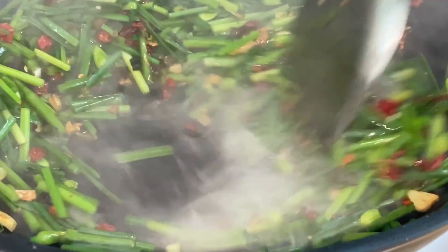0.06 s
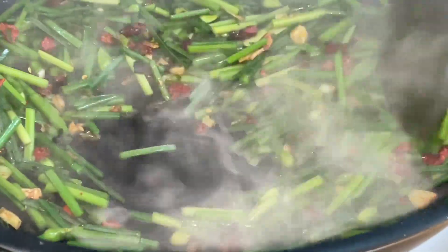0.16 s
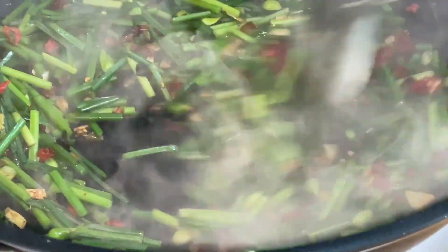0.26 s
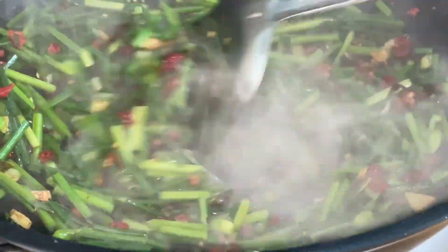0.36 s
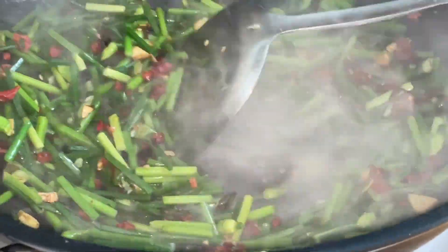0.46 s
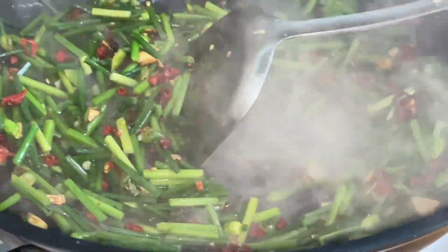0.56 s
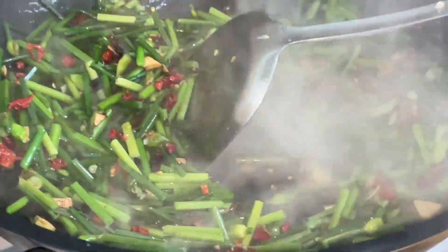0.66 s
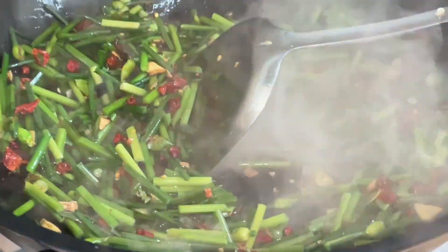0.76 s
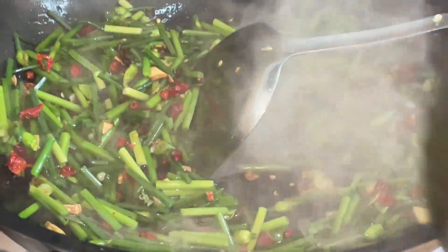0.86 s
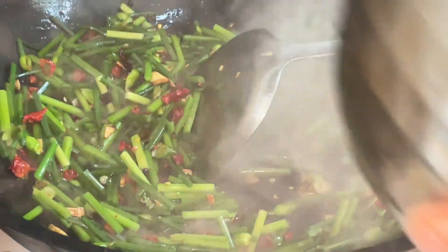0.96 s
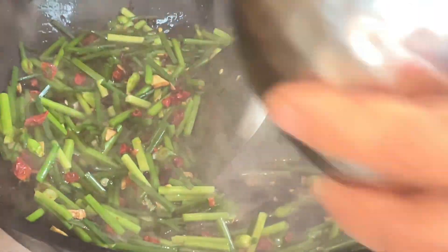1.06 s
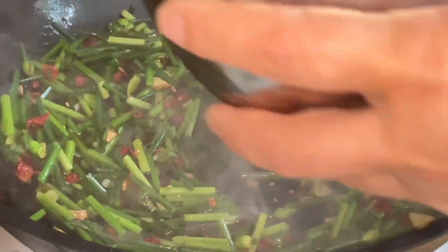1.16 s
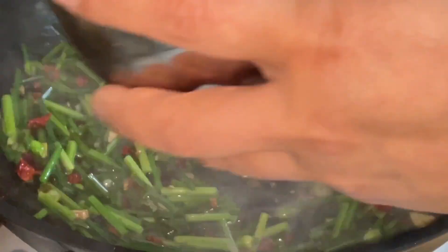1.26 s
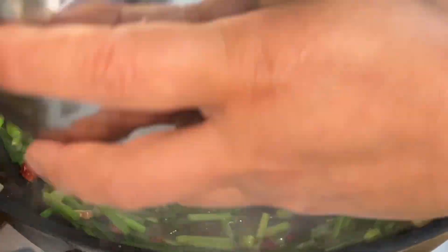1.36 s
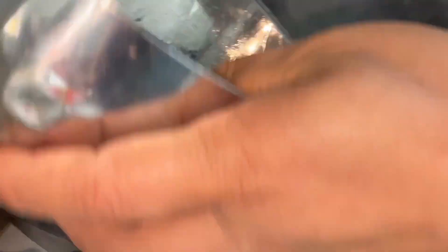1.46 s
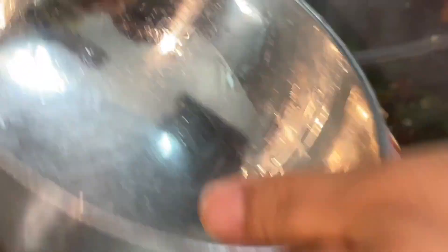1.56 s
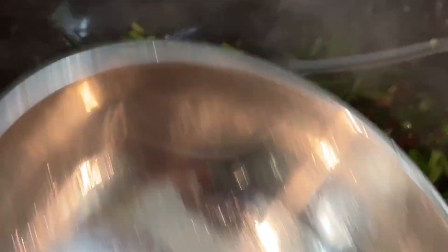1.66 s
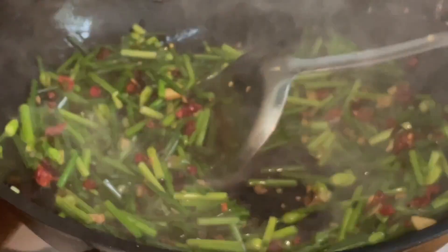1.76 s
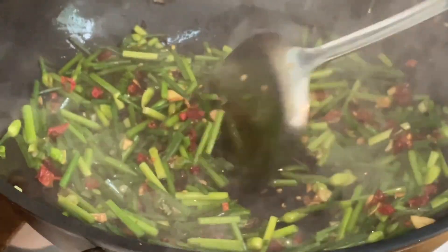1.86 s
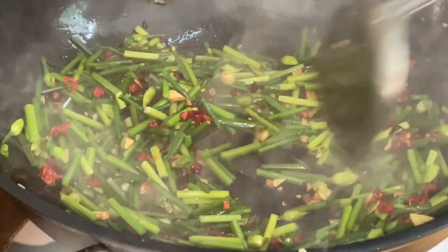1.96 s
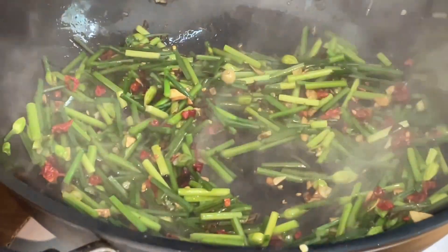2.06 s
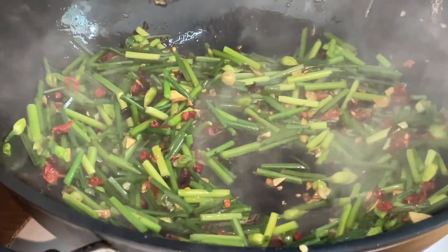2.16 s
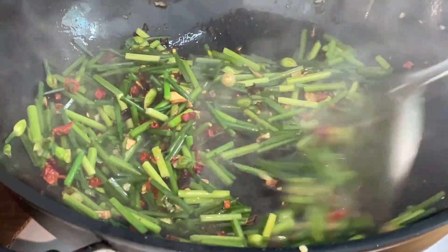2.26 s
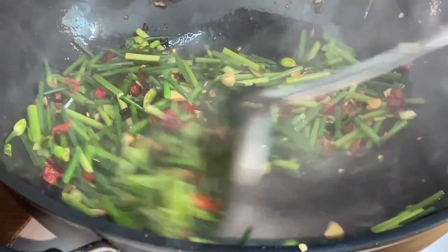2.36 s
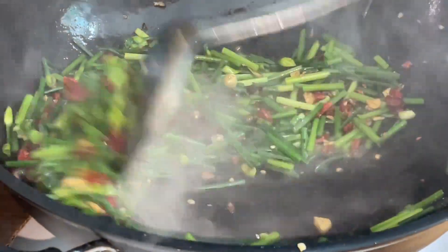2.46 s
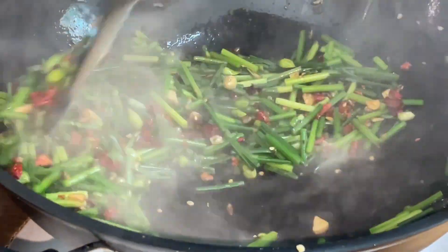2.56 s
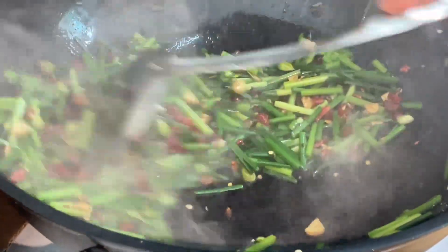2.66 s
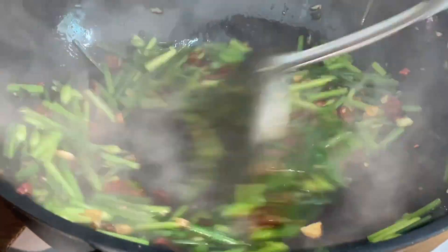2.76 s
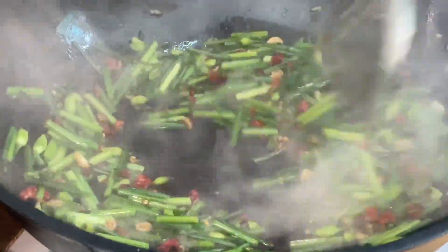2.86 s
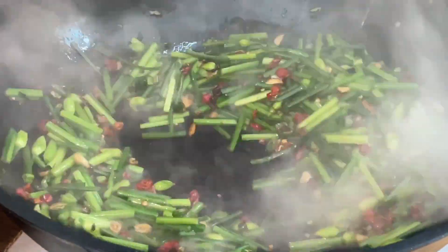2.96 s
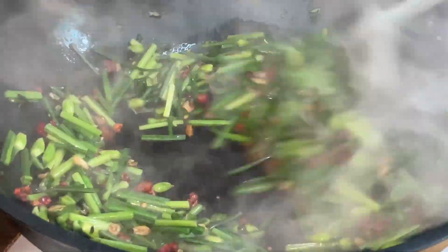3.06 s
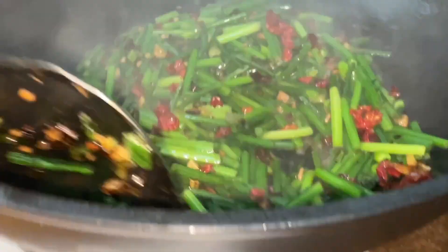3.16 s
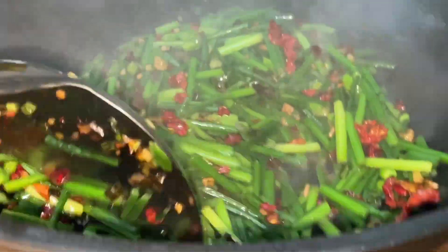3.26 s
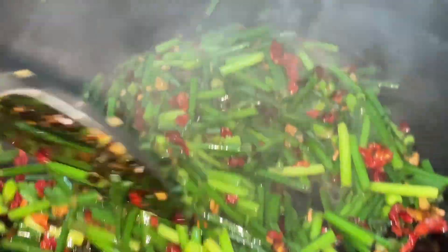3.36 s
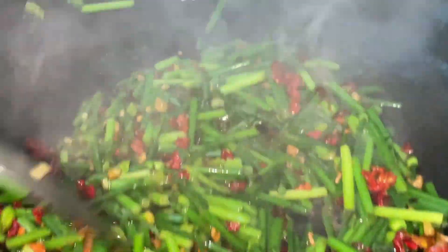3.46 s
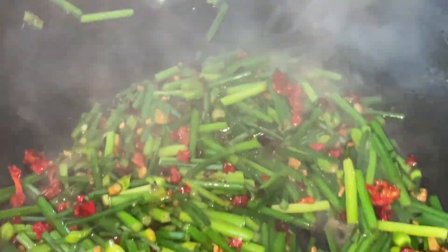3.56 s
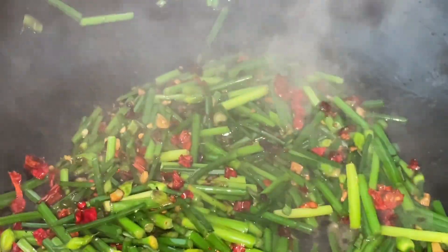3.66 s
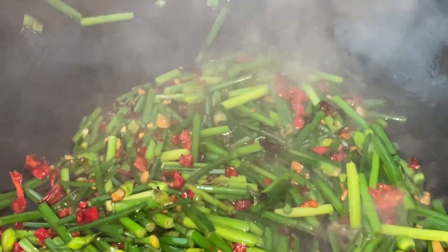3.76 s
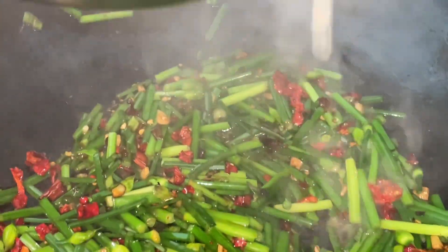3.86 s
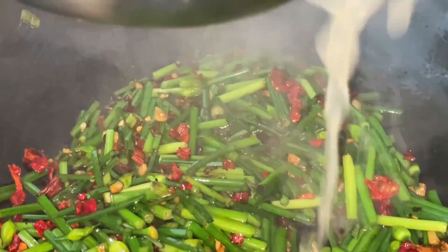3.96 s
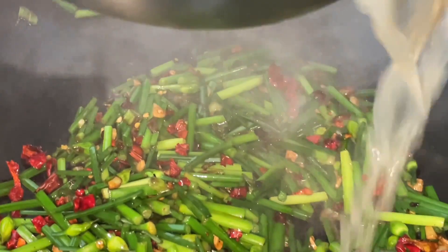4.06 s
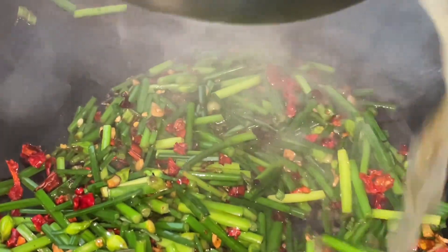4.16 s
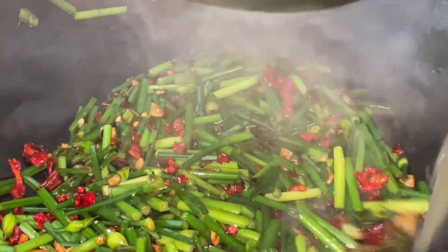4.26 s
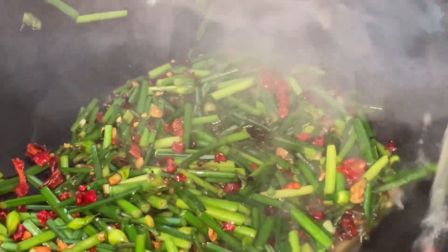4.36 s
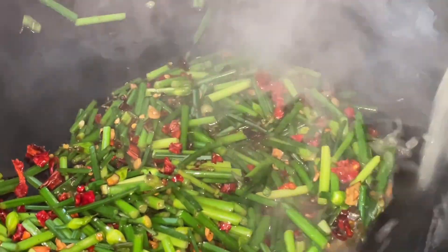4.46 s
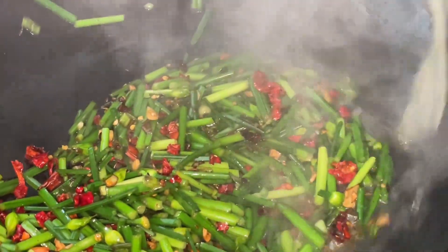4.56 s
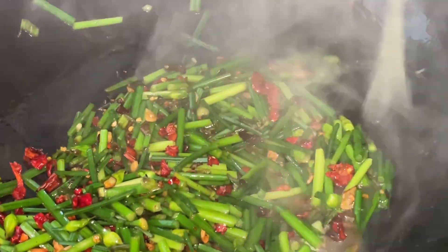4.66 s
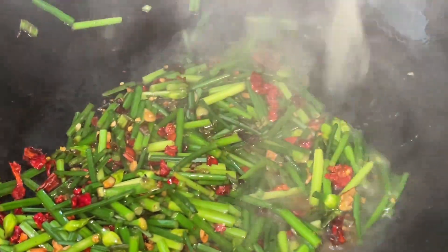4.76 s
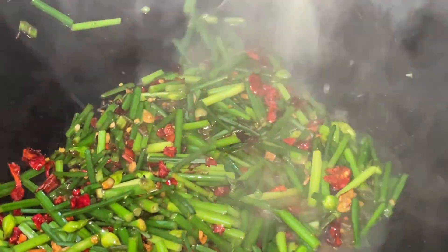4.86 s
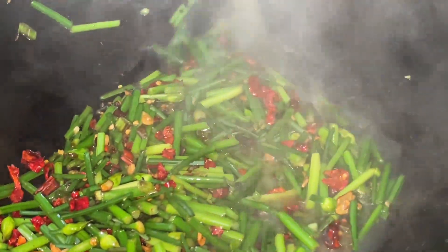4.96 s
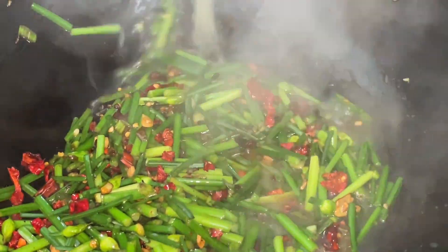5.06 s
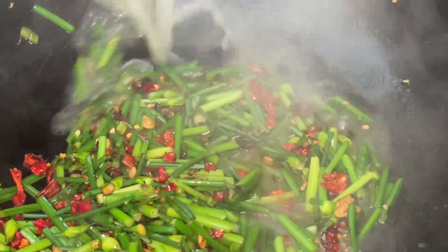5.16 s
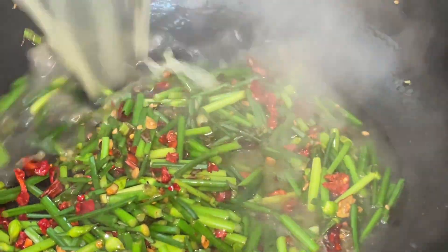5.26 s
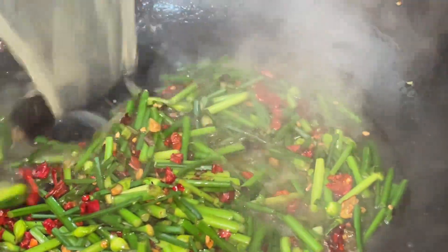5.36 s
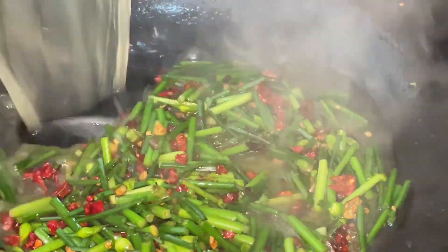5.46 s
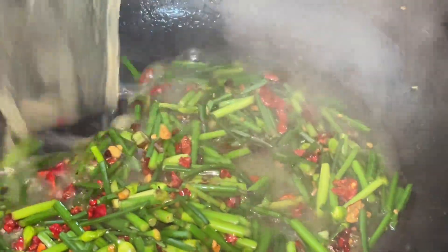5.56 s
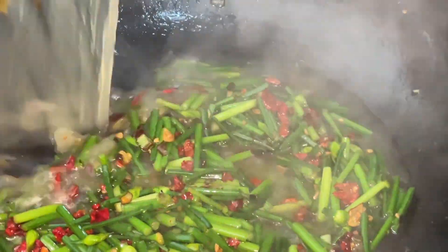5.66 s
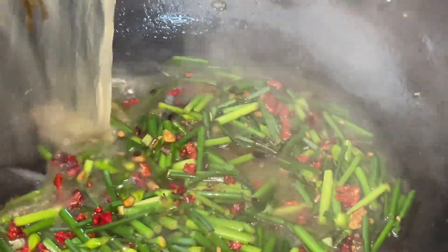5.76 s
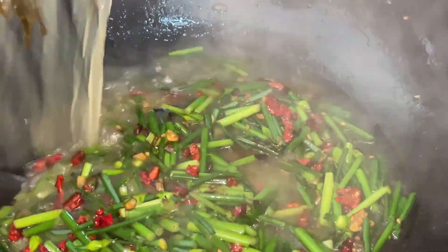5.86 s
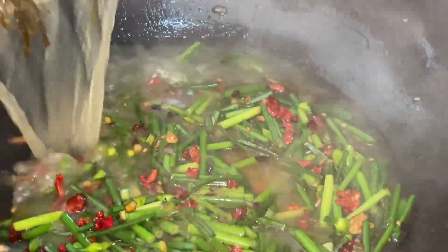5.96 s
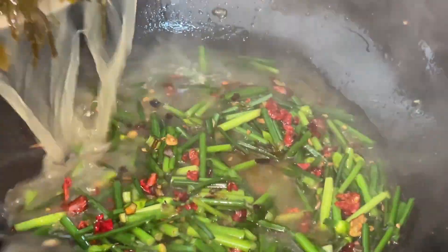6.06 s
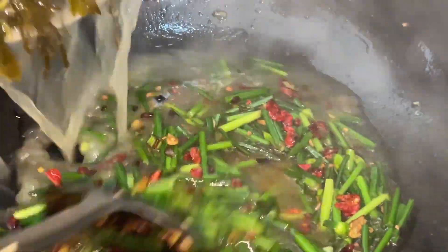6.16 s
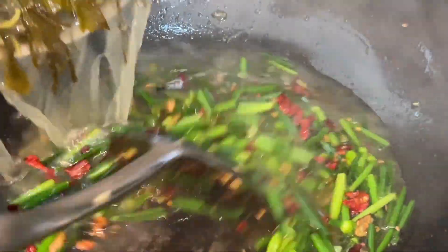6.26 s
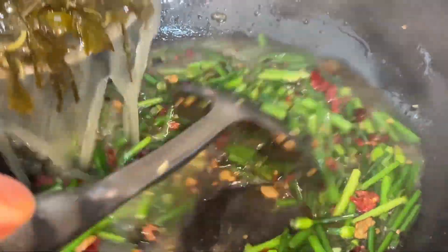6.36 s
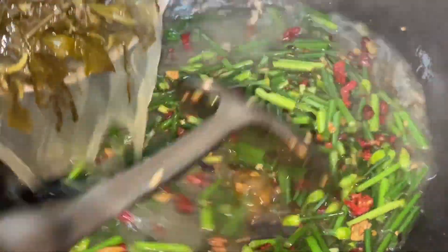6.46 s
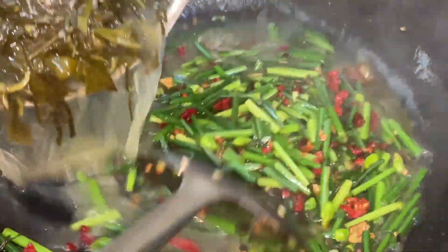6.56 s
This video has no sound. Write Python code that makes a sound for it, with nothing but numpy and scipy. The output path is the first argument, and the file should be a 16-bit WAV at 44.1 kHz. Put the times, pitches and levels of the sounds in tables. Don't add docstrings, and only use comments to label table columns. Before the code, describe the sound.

Close to a hot wok in a kitchen, greens fry with a dense bright hiss and sharp oil pops over a low extractor drone. A metal spatula knocks and rings, and a bowl gives a faint rim ring. After an abrupt cut, the flame roars louder beneath hard frying; then broth pours in, bubbling, and the hiss sinks into wet crackle with brief sizzling flares.

```python
import sys
import numpy as np
from scipy import signal
from scipy.fft import rfft, irfft, next_fast_len
from scipy.io import wavfile
from scipy.ndimage import uniform_filter1d

SR = 44100
rng = np.random.default_rng(int(sys.argv[2]) if len(sys.argv) > 2 else 0)


def log_audio(samples):
    frames = np.atleast_2d(samples).T
    limited = np.clip(frames, -1, 1)
    pcm = np.round(limited * 32767).astype(np.int16)
    wavfile.write(sys.argv[1], SR, pcm)


def boost(x):
    u = np.asarray(x, float) / 20
    return 10 ** u


N = 291927
T = np.arange(N) / SR
CUT_S = 3.1195
POUR_S = 4.9

# (time [s], peak level [dB], rise [s], fall t60 [s], ring level [dB])
KNOCKS = [
    (0.3972, -11, 0.0053, 0.17, -21),
    (1.9491, -24, 0.0022, 0.049, -28.5),
    (2.0662, -10, .011, 0.042, -19.5),
    (2.9189, -10, 0.012, 0.045, -27),
    (3.5172, -16, .004, 0.055, -28),
]


def unit(x):
    return x / np.sqrt(np.mean(x ** 2))


def ramp(s, rise):
    return np.clip((T - s) / rise, 0, 1)


def colour(x, table, size=16384):
    hz, db = np.transpose(table)
    grid_hz = np.arange(size // 2 + 1) * SR / size
    cep = irfft(np.interp(np.log(grid_hz + 1), np.log(hz), np.log(boost(db))))
    cep[1:size // 2] *= 2
    cep[size // 2 + 1:] = 0
    response = irfft(np.exp(rfft(cep)))[:size // 2]
    return signal.oaconvolve(x, response)[:N]


def walk(rate):
    k = int(SR / rate)
    held = np.repeat(rng.standard_normal(N // k + 1), k)
    return unit(uniform_filter1d(uniform_filter1d(held, k), k)[:N])


def spits(rate, scatter_db):
    chance = rng.random((3, N))
    happens = chance[0] < rate / SR
    size_db = np.minimum(-scatter_db * np.log(1 - chance[2]), 9.5)
    return unit(happens * np.sign(chance[1] - .5) * boost(size_db))


def add(track, s, sound):
    i = int(s * SR)
    track[i:i + len(sound)] += sound[:N - i]


def sizzle():
    # (frequency [Hz], level [dB])
    hiss_colour = [(700, -38.5), (1300, -12), (2000, -5.5), (3000, -1), (4500, -0.5), (6500, 1), (8000, 1),
                   (9500, -8.5), (11500, -35)]
    # (frequency [Hz], level [dB])
    air_colour = [(7000, -34.5), (8800, -3.5), (10200, -1.5), (12000, -6), (14000, -8), (15300, -6.5),
                  (17000, -10)]
    # (time [s], hiss level [dB])
    heat = [(0.0, -30.5), (0.39, -31.5), (0.97, -33), (1.28, -34.5), (1.66, -35.5), (1.94, -33.5),
            (2.39, -34.5), (3.21, -32), (3.38, -30), (4.12, -30.5), (4.7, -33.5), (5.1, -39), (5.3, -38.5),
            (5.7, -41), (5.86, -41), (6.62, -42)]
    # (time [s], boost [dB], hold [s], extra brightness [dB])
    flares = [
        (5.14, 2, 0.11, -1),
        (5.66, 1, .01, -1),
        (5.742, 2, .01, -1),
        (5.875, 5, 0.0088, 2),
        (5.936, 5, .01, -2),
        (5.986, 5, .01, 1),
        (6.037, 3, .02, -2),
        (6.086, 5, 0.19, 5),
        (6.44, 1.5, 0.057, 7),
    ]
    attack_s, release_s = .012, .05
    bared_db, bright_db = np.zeros(N), np.zeros(N)
    for s, boost_db, hold, extra_db in flares:
        shape = ramp(s, attack_s) - ramp(s + attack_s + hold, release_s)
        bared_db += boost_db * shape
        bright_db += extra_db * shape
    heat_db = np.interp(T, *np.transpose(heat))
    drown_db = -6.5 * ramp(5.26, 0.52)
    air_db = -37 + 1.1 * (heat_db + 32) + drown_db + bared_db + bright_db
    spit_share_dry, spit_share_wet = 0.14, 0.27
    share = spit_share_dry + (spit_share_wet - spit_share_dry) * ramp(POUR_S, .3)
    flicker_db = 2.7 * share * walk(14) + .5 * walk(5.04)
    steady = np.sqrt(1 - share) * rng.standard_normal((2, N))
    low, high = steady + np.sqrt(share) * spits(900, 3.3)
    hiss_db = heat_db + bared_db + 2.0 + flicker_db + 0.32 * walk(20)
    air_db = air_db + 4.5 + 0.79 * flicker_db + 0.22 * walk(26)
    return unit(colour(low, hiss_colour)) * boost(hiss_db) + unit(colour(high, air_colour)) * boost(air_db)


def pops():
    # (time [s], peak level [dB], pitch [Hz], body level [dB])
    drops = [(0.3094, -19, 3690, -11), (1.005, -13, 3300, -2), (1.2069, -15, 4800, -13),
             (1.5556, -15.5, 4270, 1), (2.4246, -14, 3400, -18), (2.5994, -27, 4540, -8),
             (2.6205, -23, 3300, 5), (2.7802, -17, 2240, 1), (3.4568, -12.5, 3300, 3),
             (3.7438, -13.5, 3400, -3), (4.1315, -14.5, 3870, -5), (4.3394, -17, 4810, -3),
             (4.551, -4.5, 3280, -14), (5.3976, -34, 2280, -8), (5.537, -21, 4400, -12),
             (5.887, -24, 2980, -15), (5.999, -28, 4910, -8), (6.0998, -20, 3280, -10),
             (6.3723, -25.5, 4850, -3), (6.403, -26, 2730, 2), (6.45, -37, 2470, -8)]
    out, t = np.zeros(N), T[:SR // 10]
    late = np.maximum(t - .0042, 0)
    for s, db, hz, body_db in drops:
        over_db = db + 15
        echo_db = -3 + 0.45 * over_db
        echo_t60 = 0.047 * boost(-.6 * max(over_db, 0))
        band = signal.butter(1, [hz / 2.16, hz * 2.54], "band", fs=SR, output="sos")
        grit = signal.sosfilt(band, rng.standard_normal(len(t)))
        cycles = np.exp(-t * hz / 2.35) * np.sin(2 * np.pi * hz * t)
        crack = 0.77 * grit * np.exp(-t / 0.0021)
        knock = boost(body_db) * np.exp(-t / 0.00043) * np.sin(2 * np.pi * 1150 * t)
        snap = 1.3 * np.minimum(t / .0006, 1) * (cycles + crack + knock)
        echo = boost(echo_db - 5.0) * grit * np.minimum(late / 0.0023, 1) * 1000. ** (-late / echo_t60)
        add(out, s + .0006, boost(db) * (snap + echo))
    return out


def bubbles():
    # (time [s], pitch [Hz], level [dB], t60 [s])
    lone = [(.30, 990, -36, 0.15), (2.465, 1020, -33.5, 0.093), (2.765, 4900, -30, .06),
            (3.43, 3050, -31, .08), (3.47, 3350, -31, .1), (3.76, 1500, -37, 0.18), (5.13, 3630, -31, 0.05),
            (5.74, 741, -38, 0.1), (5.985, 5440, -31, 0.09), (5.65, 1500, -37, .05), (5.68, 2200, -36, .03),
            (6.11, 2100, -35, .04), (6.07, 2700, -36, .04), (6.05, 1090, -32, 0.078),
            (6.045, 1530, -32, 0.059), (5.985, 3700, -38, 0.058), (6.015, 2130, -38, 0.055)]
    out = np.zeros(N)
    chance = rng.random((int(260 * 1.7), 4))
    when = POUR_S + (T[-1] - POUR_S) * chance[:, 0]
    pitch = 800 * 2 ** (2.8 * chance[:, 1] ** 1.5)
    level_db = -46.5 + 4.7 * chance[:, 2]
    ring_s = (30 + 60 * chance[:, 3]) / pitch
    poured = np.transpose([when, pitch, level_db, ring_s])
    for s, hz, db, t60 in [*lone, *poured]:
        t = T[:int(t60 * SR)]
        shape = np.minimum(t / 0.00067, 1) * 1000. ** (-t / t60)
        rising = np.sin(2 * np.pi * hz * t * (1 + 0.0053 * t / t60))
        add(out, s, boost(db) * shape * rising)
    return out


def spatula():
    # (frequency [Hz], level [dB], t60 [s])
    knock_modes = [
        [(2336, -3, .14), (2960, 8, .04), (3620, -5, .15), (3850, -5, .35), (4587, 0, .12), (4732, -6, .25),
         (1530, -6, .12), (6410, -7, .2), (4290, -7, .2), (510, -12, .08)],
        [(1066, 2, .5), (1707, -1, .6), (2196, -8, .34), (2363, -2, .47), (3682, -4, .3), (4330, -3, .16),
         (3569, -12, .14), (2900, -12, .1)],
        [(1066, -12, .3), (5450, -4, .08), (1480, -8, .2), (1523, -7, .28), (2929, 3, .25), (4430, -17, .4),
         (4797, -11, .3), (4600, -1, .08), (6350, 5, .08), (7100, 4, .06)],
        [(1509, 3, .29), (1517, 2, .29), (1560, -2, .07), (2290, -10, .06), (4420, 2, .07), (5400, 2, .05),
         (6900, -2, .07)],
        [(1500, 3, .17), (1300, -3, .1), (2900, -11, .1), (3400, -9, .1), (5600, 5, .08)],
    ]
    # (frequency [Hz], level [dB])
    thuds = [
        (171, -22),
        (783, -13.5),
        (740, -22.5),
        (1100, -51),
        (1500, -20),
    ]
    # (frequency [Hz], level [dB])
    skid_colour = [(300, -36), (1200, -11), (2500, -5.5), (4500, -1.5), (7000, -1.5), (10000, -5),
                   (15000, -16)]
    skid, out, t = np.zeros(N), np.zeros(N), T[:SR // 2]
    for (s, db, rise, fall, ring_db), modes, (thud_hz, thud_db) in zip(KNOCKS, knock_modes, thuds):
        push = np.minimum(0.35 + 0.8 * t / rise, 1)
        bite = 1000. ** (-np.maximum(t - rise, 0) / fall)
        scrape = 0.18 * 1000. ** (-t / (8.3 * fall))
        chatter = boost(2 * np.repeat(rng.standard_normal(len(t) // 40 + 1), 40)[:len(t)])
        add(skid, s, boost(db - 7.0) * push * (bite + scrape) * chatter * rng.standard_normal(len(t)))
        waver = uniform_filter1d(rng.standard_normal((12, len(t))), 700) * np.sqrt(700)
        ring = np.zeros(len(t))
        for (hz, mode_db, t60), w in zip(modes, waver):
            ring += boost(mode_db + 2 * w) * 1000. ** (-t / t60) * np.sin(2 * np.pi * hz * t + 0.34 * w)
        add(out, s, boost(ring_db) * push * ring)
        thud = boost(thud_db) * 1000. ** (-t / 0.033) * np.sin(2 * np.pi * thud_hz * t)
        add(out, s + 1.08 * rise, thud)
    return out + 1.77 * colour(skid, skid_colour)


def hood():
    # (frequency [Hz], level [dB per Hz])
    rumble_colour = [(15, -35), (25, -8.5), (102, 0), (118, 0), (141, -8), (188, -5.5), (210, -8),
                     (244, -10.5), (275, -19), (330, -18), (430, -42.5), (730, -120)]
    # (frequency [Hz], level [dB per Hz])
    simmer_colours = [
        [(150, -22), (260, -8.5), (296, -7), (409, -3.5), (441, -3), (506, -0.5), (616, -5), (944, -5.5), (1260, -6), (1730, -15.5), (2000, -4.5), (2600, -17.5), (4400, -120)],
        [(150, -31), (260, -7.5), (366, -9), (412, -2), (502, -7), (561, 1.5), (643, -2), (718, 0.5), (881, -8.5), (1410, -5.5), (1550, -10.5), (1730, -8), (2000, -5), (2600, -9.5), (4400, -120)],
    ]
    before = T < CUT_S
    flame_low_db, flame_high_db = -49.5, -40.5
    flame_db = flame_low_db + (flame_high_db - flame_low_db) * ramp(3.36, 0.39)
    rumble_db = np.where(before, -47, flame_db) + 1.1 + 0.77 * walk(6)
    rumble = unit(colour(rng.standard_normal(N), rumble_colour)) * boost(rumble_db)
    toss_db = sum(2 * (ramp(s, 0.013) - ramp(s + .02, 0.27)) for s, *_ in KNOCKS)
    simmer_db = toss_db + np.where(before, -49, -43 - 0.28 * (T - CUT_S))
    glug = rng.standard_normal(N) + .3 * spits(150, 1.3)
    dry_pan, later_pan = (unit(colour(glug, table)) for table in simmer_colours)
    return rumble + np.where(before, dry_pan, later_pan) * boost(simmer_db + 1.94 + 1.1 * walk(9))


def scene():
    # (frequency [Hz], left gain [dB], left lag [rad], unrelated sound [dB])
    ports = [(40, -1, -0.1, -27), (90, -0.1, 0.3, -20), (350, 0.5, 0.4, -10.5), (840, -2, 0.91, -28),
             (936, -2.5, -1, -1), (1200, -4.5, 0.83, -5), (1450, -1, 0.5, -10), (1654, -4.5, 0.5, -16),
             (1777, -10, 2.5, -23), (1804, -4, -1, -3), (1950, 1.5, 0.5, -14), (2095, 0, 0, 0),
             (5950, 1.5, 0, -26.5), (7086, 0.5, 1.05, -35), (7990, 0.5, 3, -24), (10190, -1, 5.5, -9),
             (11700, 0, 5.5, -16), (13200, -1.5, 7.5, -13), (14600, 2, 9, -20), (16000, -4, 9.5, -20)]
    hits = spatula() + pops() + bubbles()
    to_cut = np.where(T < CUT_S, CUT_S - T, .085 * (T - CUT_S))
    fade = np.clip(to_cut / .002, .15, 1)
    near = fade * (sizzle() + hood() + hits)
    other = fade * (sizzle() + hood() + 0.43 * np.roll(hits, 60))
    m = next_fast_len(N + 4096)
    bin_hz = np.maximum(np.arange(m // 2 + 1) * SR / m, 1.)
    hz, *columns = np.transpose(ports)
    gain_db, lag, other_db = (np.interp(bin_hz, hz, c) for c in columns)
    left = rfft(near, m) * boost(gain_db) * np.exp(-1j * lag) + boost(other_db) * rfft(other, m)
    treble = left * np.clip((bin_hz - 5500) / 1500, 0, 1)
    sway = .09 * walk(9)
    drift = irfft(treble, m)[:N] * (np.cos(sway) - 1) + irfft(-1j * treble, m)[:N] * np.sin(sway)
    return np.array([irfft(left, m)[:N] + drift, near])


def thin_stereo(pair):
    pad = 1214
    ms = np.pad([pair[0] + pair[1], pair[0] - pair[1]], ((0, 0), (pad, 2048))) / 2
    hz, s, z = signal.stft(ms, SR, "cosine", 2048, 1024, boundary=None)
    frames = len(s)
    loud = [abs(ms[0, k * 1024 + 512:k * 1024 + 1536]).max() > .6 for k in range(frames)]
    keep = np.ones(z.shape)
    # band width in bins, threshold in dB, frames its scatter is held
    for weak, bins, low_db, hold in ((1, 32, -5.0, 4), (0, 12, -9.5, 3)):
        power = np.add.reduceat(abs(z) ** 2, np.arange(0, len(hz), bins), axis=1)
        mood = np.repeat(rng.standard_normal((power.shape[1], frames)), hold, axis=1)[:, :frames]
        threshold_db = low_db + 3.5 * np.clip(mood, -1.6, 1.6)
        kept = power[weak] > power[1 - weak] * boost(2 * threshold_db)
        keep[weak] = np.repeat(kept, bins, axis=0)[:len(hz)]
    keep[:, hz < 2050] = 1
    top_hz = 14300 - 700 * np.repeat(rng.random(frames), 3)[:frames] ** 2
    keep[0] *= hz[:, None] < top_hz
    keep[:, :, loud] = 1
    mid, side = signal.istft(z * keep, SR, "cosine", 2048, 1024, boundary=False)[1][:, pad:pad + N]
    return np.array([mid + side, mid - side])


def roll_off(x):
    return signal.sosfilt(signal.butter(12, 15650, fs=SR, output="sos"), x)


def record(dry):
    low_pass = signal.ellip(10, .2, 60, 15500, fs=SR, output="sos")
    high_pass = signal.butter(6, 35, "high", fs=SR, output="sos")
    cut = signal.sosfilt(high_pass, signal.sosfilt(low_pass, dry))
    mix = np.clip(thin_stereo(cut), -1, 1)
    return roll_off(mix)


dry = scene()
out = record(dry)
log_audio(out)
```